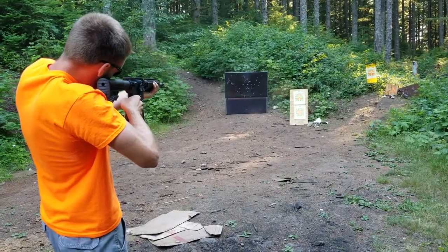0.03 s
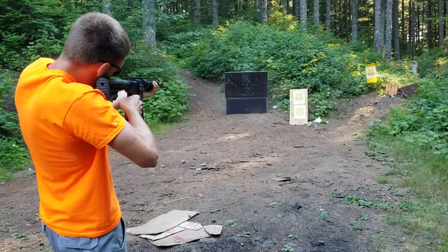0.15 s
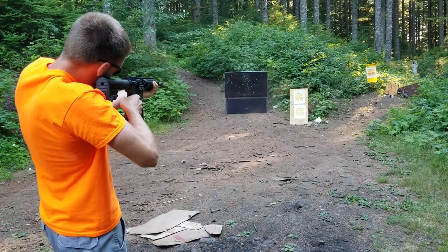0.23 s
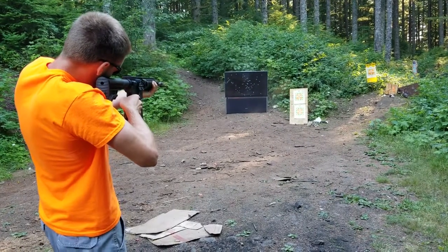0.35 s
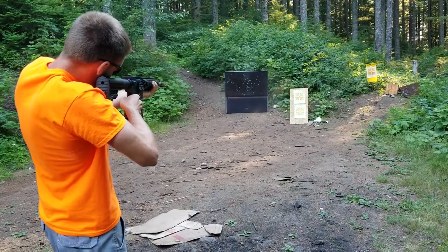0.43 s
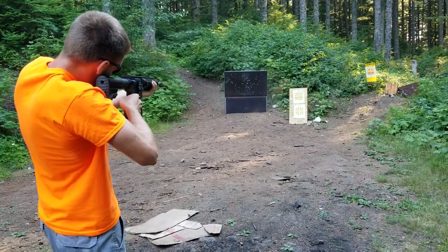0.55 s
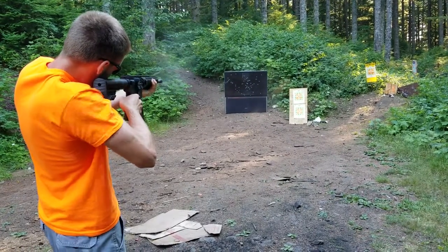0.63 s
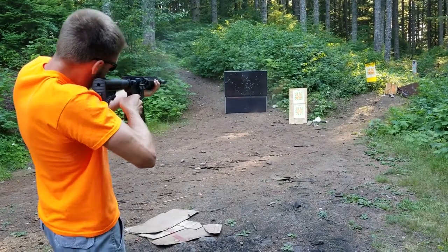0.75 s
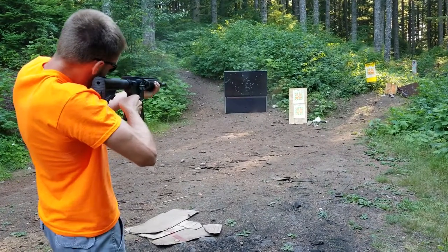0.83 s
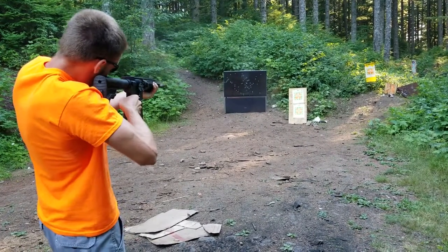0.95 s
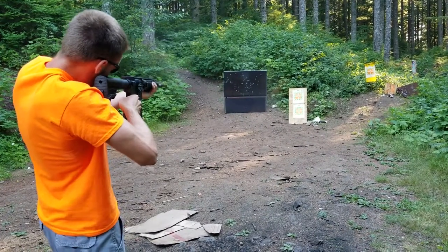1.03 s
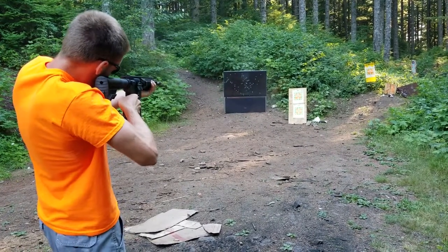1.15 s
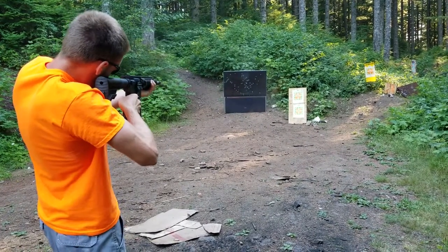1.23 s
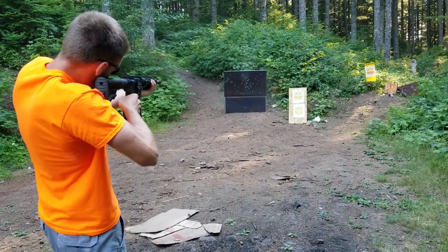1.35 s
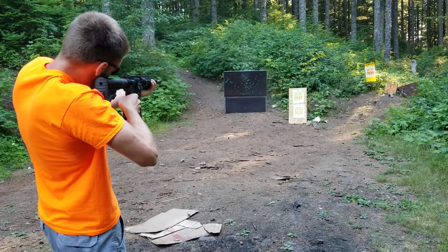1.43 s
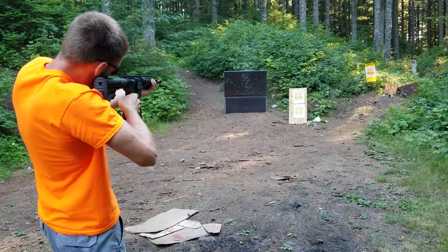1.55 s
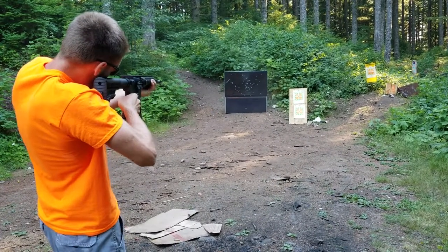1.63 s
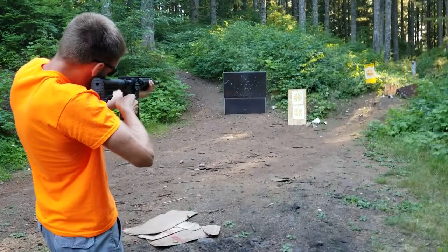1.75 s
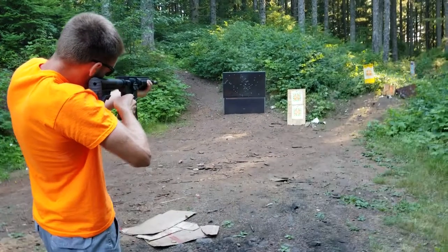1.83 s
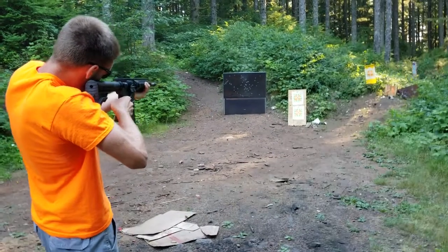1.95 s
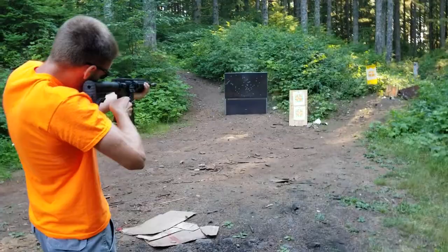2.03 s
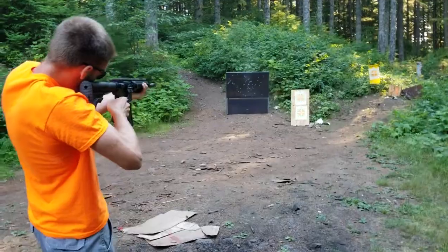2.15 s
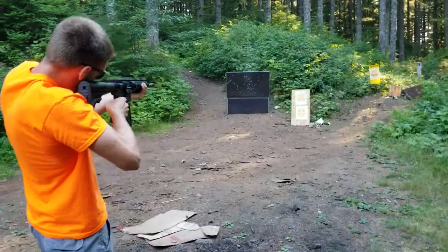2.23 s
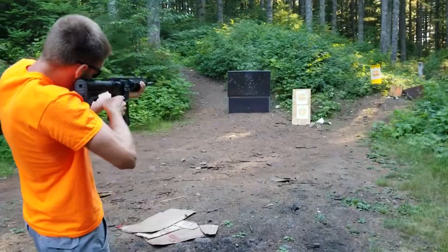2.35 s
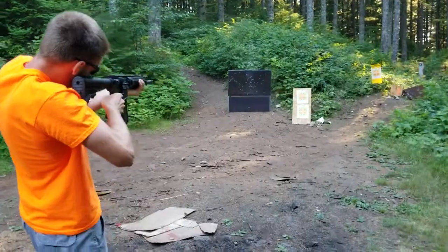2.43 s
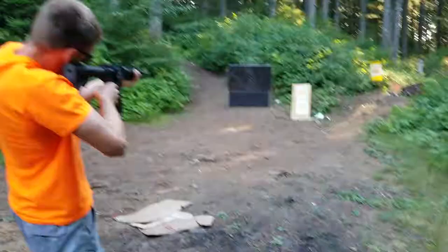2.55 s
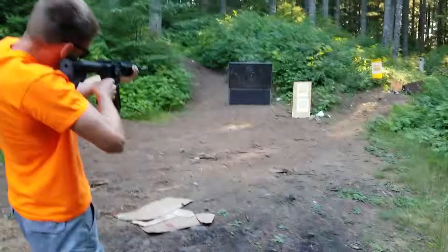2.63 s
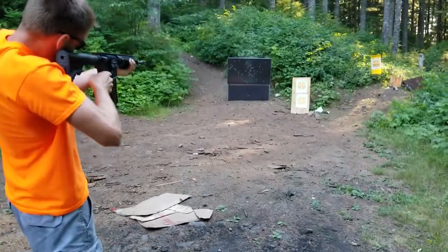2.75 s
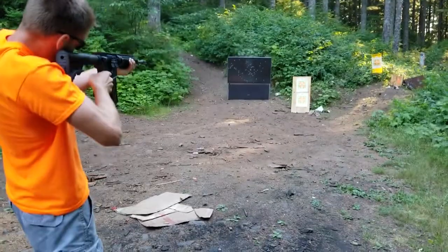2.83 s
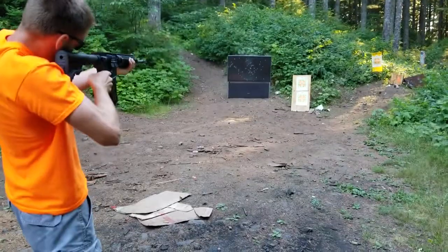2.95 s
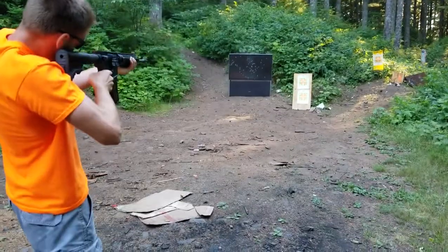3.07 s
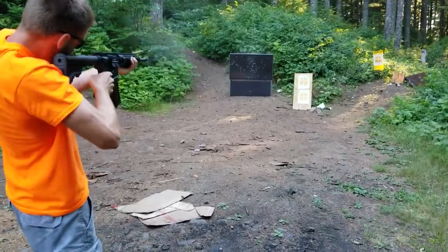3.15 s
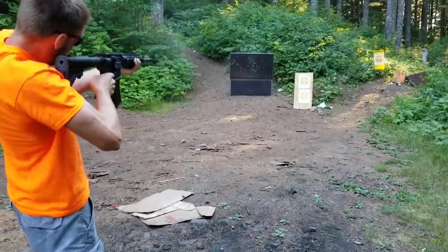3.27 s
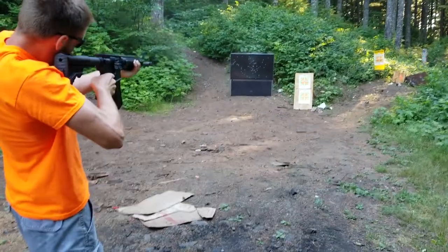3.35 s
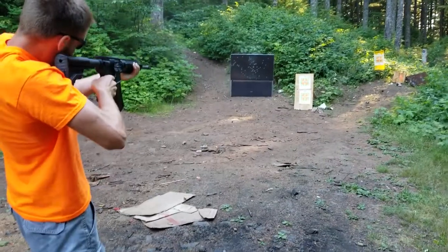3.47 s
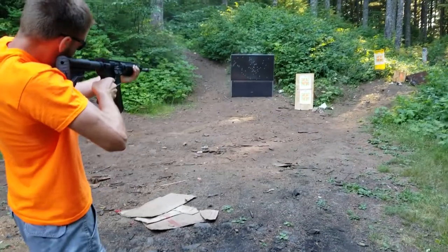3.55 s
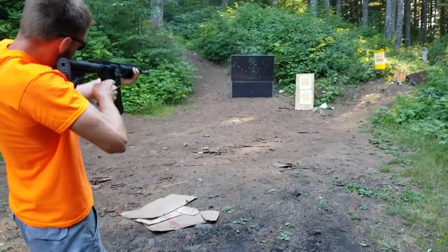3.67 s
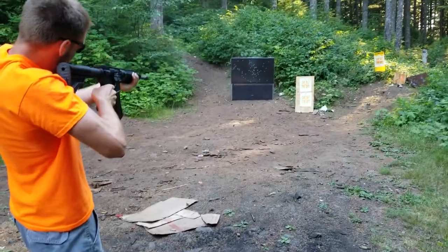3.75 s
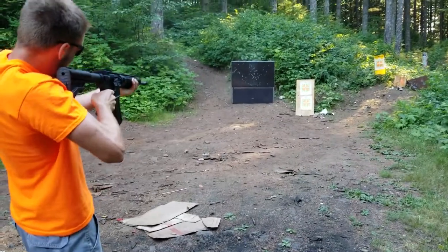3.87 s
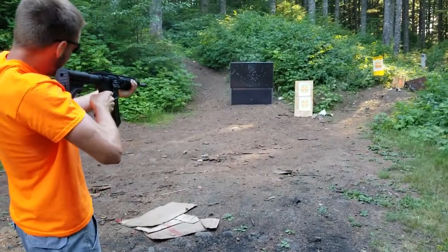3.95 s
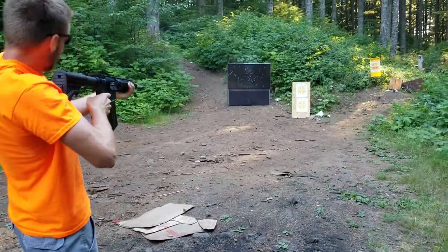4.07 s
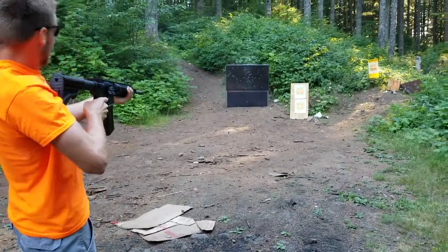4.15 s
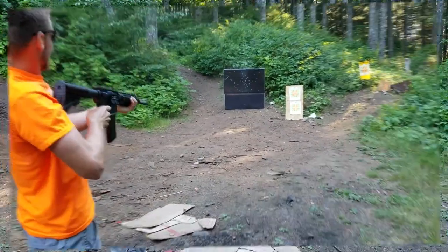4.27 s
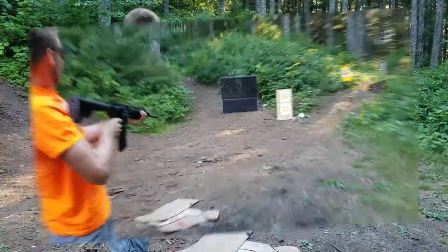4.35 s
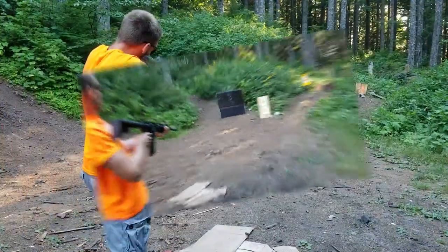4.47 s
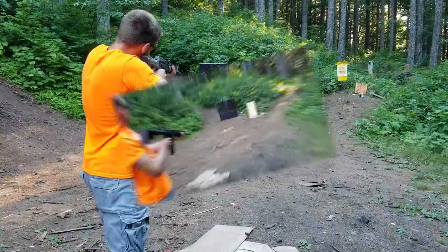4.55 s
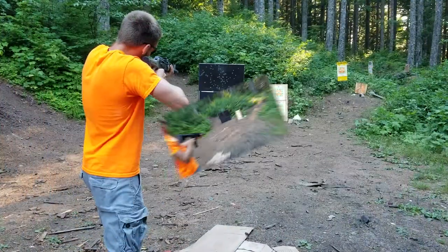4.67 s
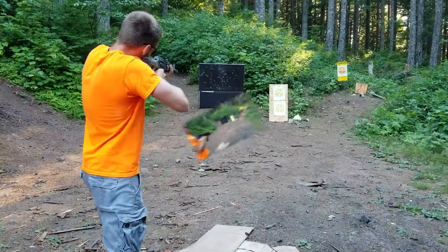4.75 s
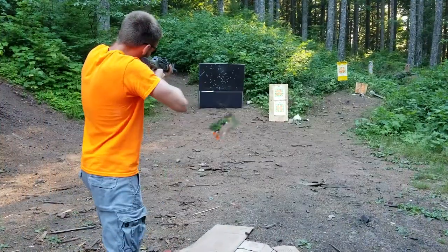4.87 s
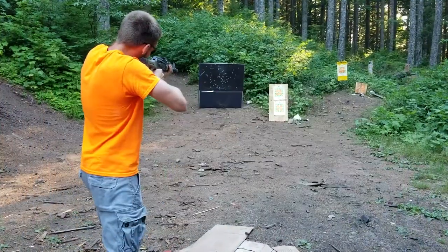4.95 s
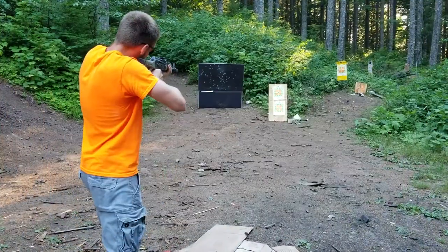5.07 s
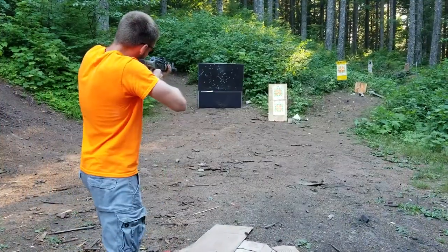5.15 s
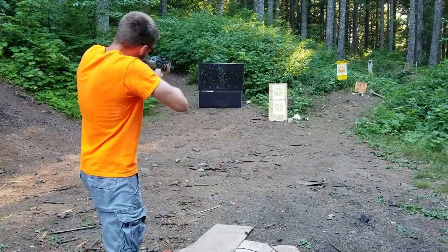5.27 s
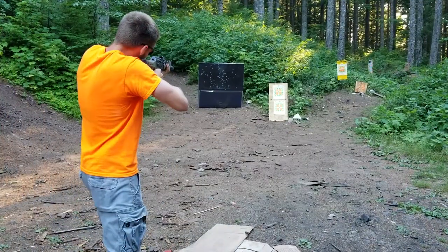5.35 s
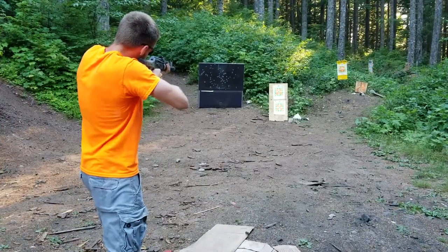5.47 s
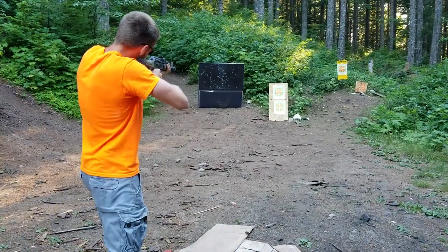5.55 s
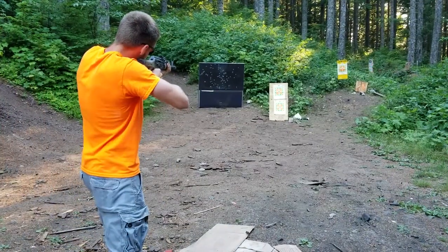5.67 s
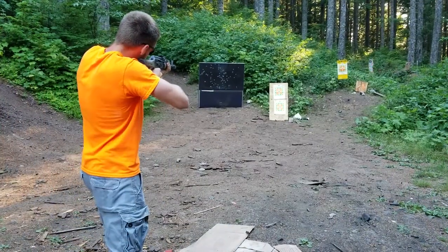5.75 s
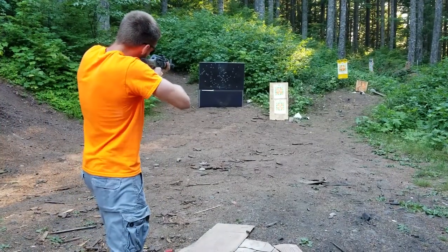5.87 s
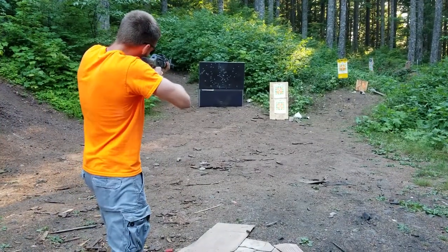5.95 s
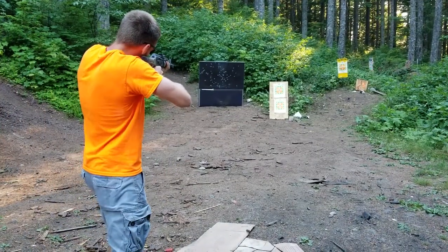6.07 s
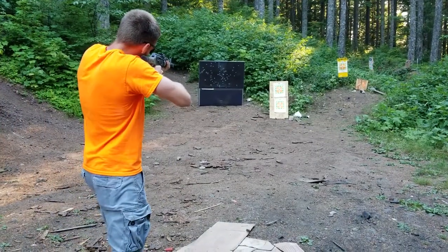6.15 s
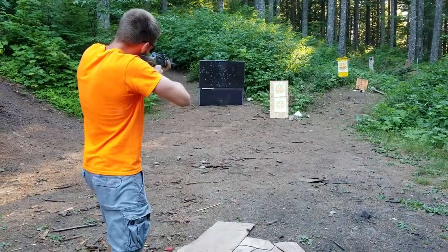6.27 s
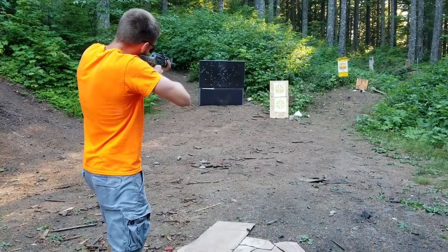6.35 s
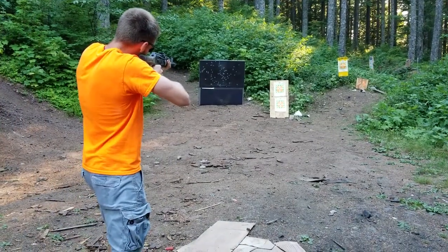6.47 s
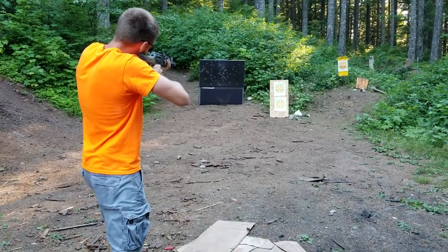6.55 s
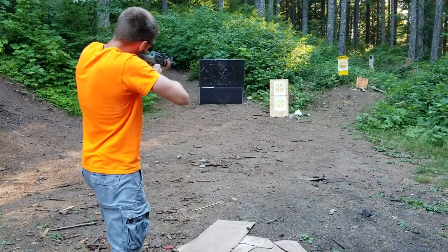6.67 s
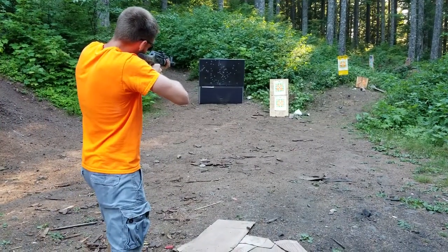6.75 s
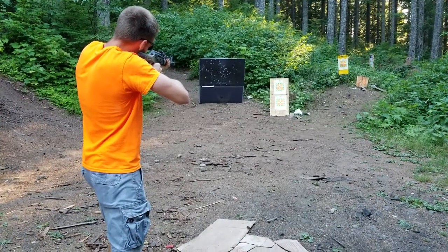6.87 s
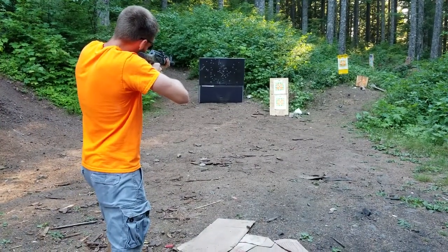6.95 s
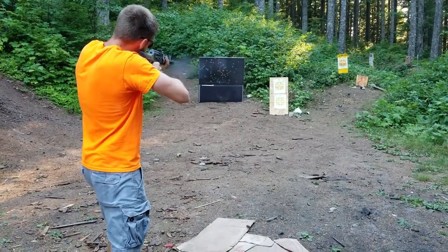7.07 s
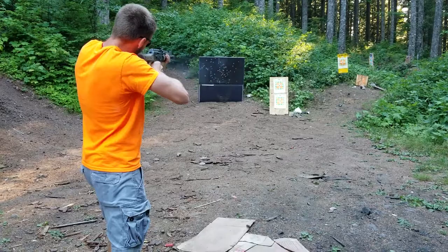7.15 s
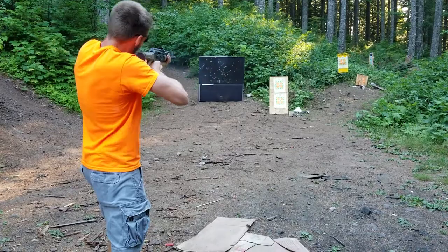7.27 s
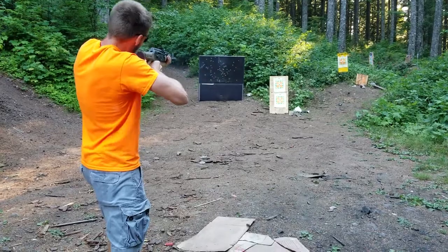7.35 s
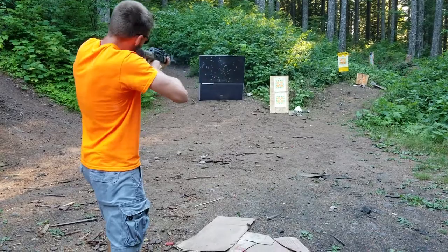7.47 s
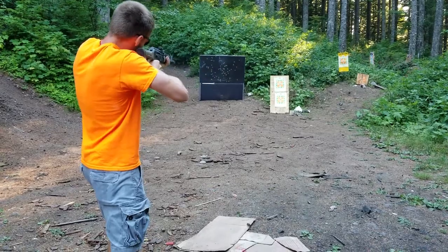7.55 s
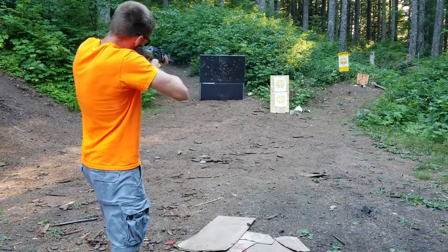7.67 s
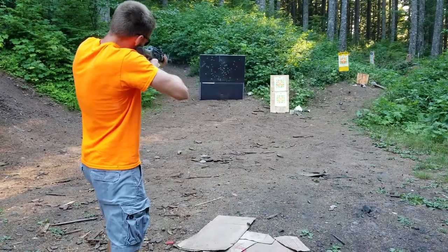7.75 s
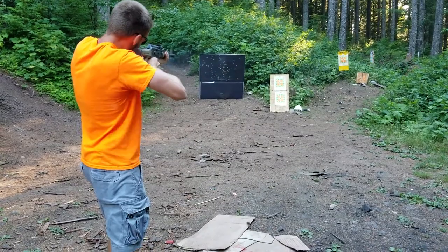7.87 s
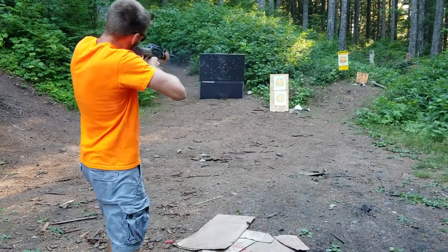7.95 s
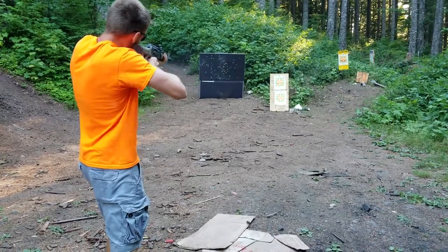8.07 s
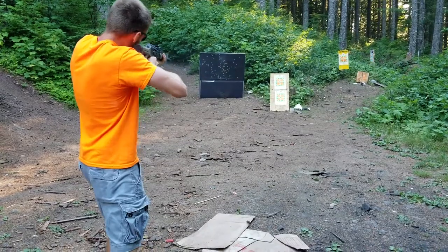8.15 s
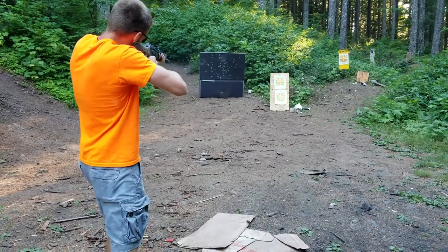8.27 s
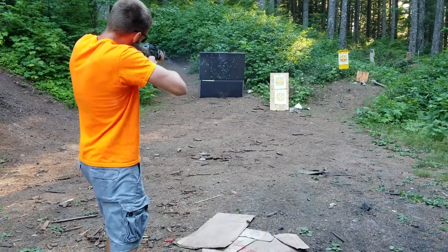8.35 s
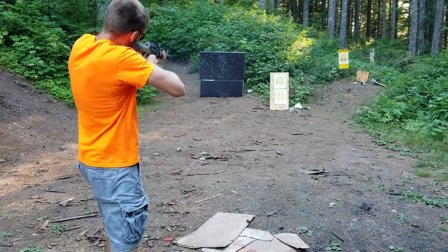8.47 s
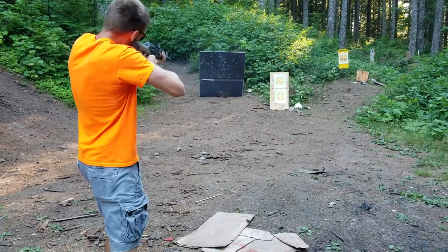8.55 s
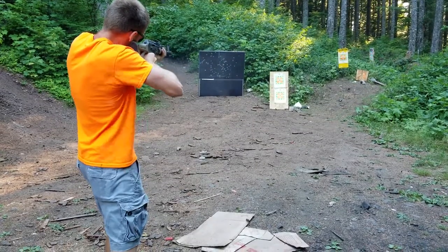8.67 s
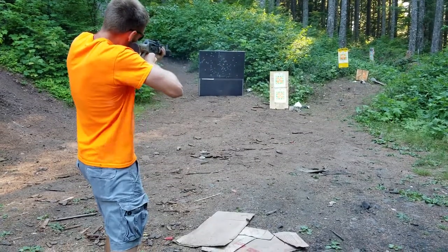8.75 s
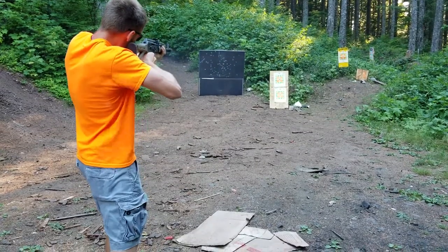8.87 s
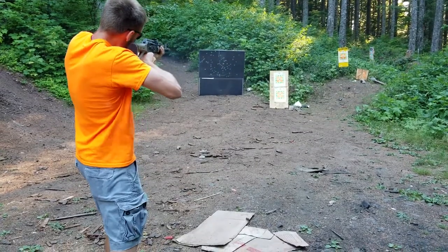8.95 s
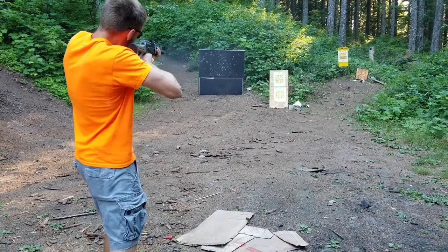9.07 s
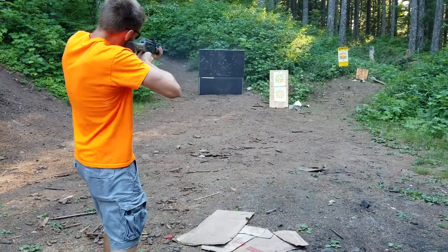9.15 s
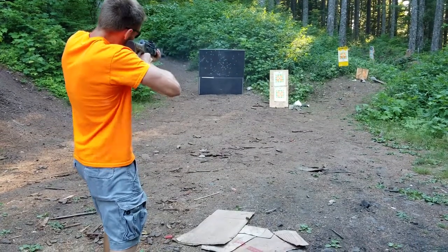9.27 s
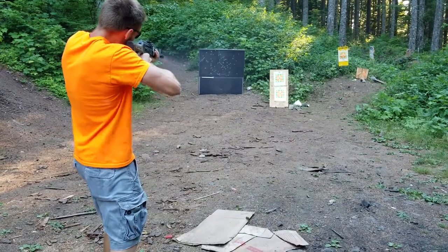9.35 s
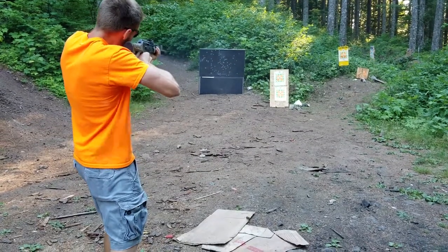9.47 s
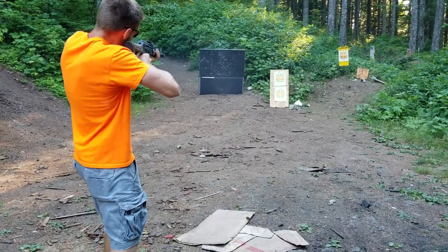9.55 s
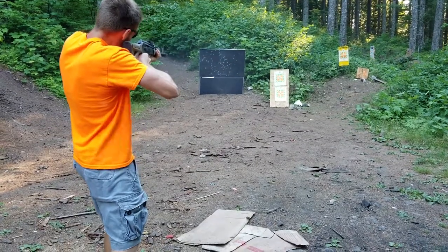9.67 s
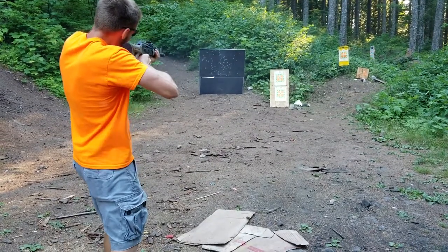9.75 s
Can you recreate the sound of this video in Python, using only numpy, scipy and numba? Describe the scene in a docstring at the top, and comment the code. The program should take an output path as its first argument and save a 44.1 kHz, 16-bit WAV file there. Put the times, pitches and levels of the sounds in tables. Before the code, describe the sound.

Just behind a shooter in a forest clearing, the fading tail of an earlier shot opens, then two single rifle blasts about two and a half seconds apart, each with slaps off banks and trunks and a long rolling echo. After a quiet gap with faint ticks, another shot from slightly further back leads to a rapid burst of shots. A small stereo recorder squashes and overloads on the bangs.

```python
"""Rifle shots in a forest clearing

Heard from just behind the shooter: the tail of an earlier shot, two single shots, a cross-fade to a second
stand further back, then one shot and a rapid string. Blasts are decaying noise with a low pressure pulse;
banks and trunks return N-shaped slaps, the forest a rolling tail, a far hillside a late swell.
Ticks, faint hums, a rustle and quiet air lie beneath; a small recorder limits, overloads and recovers."""
import sys
import numpy as np
from scipy import signal
from scipy.fft import rfft, irfft, next_fast_len
from scipy.io import wavfile
from numba import njit

SR = 44100
rng = np.random.default_rng(int(sys.argv[2]) if len(sys.argv) > 2 else 0)


def pcm_store(signal):
    """Save signal as 16-bit PCM."""
    levels = np.round(np.clip(np.atleast_2d(signal), -1, 1) * 32767)
    wavfile.write(sys.argv[1], SR, levels.astype(np.int16).T)


def voltage_ratio(level):
    """Linear amplitude factor for a level in decibels (scalar or array-like)."""
    return 10 ** (np.asarray(level, float) / 20)


N = 432621

# Cross-fade from the near stand to the one further back: start and end [t/s]
CROSSFADE = [4.55, 5.15]
# Shots: [t/s, blast level/dB, thump level/dB]; a shot before t = 0 leaves only its tail
SHOTS = [(-1.9, 0, -22), (.5827, 0, -15), (3.1112, 0, -11), (7.0615, 0, 6), (7.7748, 0, -17),
         (8.3053, -1.5, -23), (8.5624, 0, -18), (8.7787, 0, -18), (9.0334, 0, -19), (9.3125, 0, -19),
         (9.5634, 0, -14)]
LEFT_DB = .6   # the left microphone faces the muzzle: left-right level difference
TILT_DB_PER_OCT = .8   # spread of the crack's brightness from shot to shot


def rifle():
    """Superposition: direct sound, slaps and tails of every shot add linearly; one stereo track per stand."""
    out = np.zeros((2, 2, N))
    long, short = 2 ** 17, 2 ** 14   # samples
    reflectors = [[row[1:] for row in SLAPS if row[0] == name] + trunks(count=16) for name in ("near", "back")]
    hill = hillside(long)
    tails = [forest(stand, long) + hill for stand in range(2)]
    push = thump(short)
    tilts = TILT_DB_PER_OCT * rng.standard_normal(len(SHOTS))
    for (s, db, thump_db), tilt in zip(SHOTS, tilts):
        at, stand = round(s * SR), int(s > CROSSFADE[0])
        track = out[stand]
        add(track, voltage_ratio(db) * tails[stand], at)
        if at > 0:
            add(track, voltage_ratio(db) * slaps(reflectors[stand], short), at)
            add(track, voltage_ratio(db) * crack(stand, tilt, short), at - round(.0015 * SR))
            add(track, voltage_ratio(thump_db) * push, at + round(.0025 * SR))   # peaks after the crack
            hammer(track, stand, at)
            bolt(track, at)
    return out * voltage_ratio(LEFT_DB * np.array([[.5], [-.5]]))


# Muzzle crack scattered by things close by: spectrum [f/Hz, level/dB per Hz]
CRACK = [(18, -30), (40, -17), (190, -10), (400, -8), (900, -8), (1200, -13), (3200, -11), (5900, -12),
         (6800, -9), (7500, -14), (8400, -21), (11000, -16), (14500, -13), (16200, -22)]
# Its decay [f/Hz, t60/s]
CRACK_T60 = [(40, .12), (150, .15), (500, .2), (1500, .24), (4000, .24), (8000, .22), (14000, .22)]
# Its level at the near and back stand [level/dB]
CRACK_DB = [13.0, 13.0]


def crack(stand, tilt, size):
    """Turbulent noise: a fresh random burst for each shot, with frequency-dependent decay."""
    t = np.arange(size) / SR
    colour = [(hz, level_db + tilt * np.log2(hz / 2500)) for hz, level_db in CRACK]
    rise = np.minimum(t / .0055, 1) ** 2
    return voltage_ratio(CRACK_DB[stand]) * dying(colour, CRACK_T60, size) * rise


def thump(size):
    """Critically damped response: a pressure step pushes the diaphragm, which swings back and settles."""
    settle = np.arange(size) / SR / .005   # time in units of the 5 ms settling constant
    # a push, then a slower pull of equal area
    return settle * (2 - settle) * np.exp(-settle) * np.ones((2, 1))


# Strong slaps off ground, banks and big trunks:
# [stand, t/ms after the blast, level/dB, left-right level/dB, f/Hz]
SLAPS = [("near", 1.5, 5, -3, 900), ("near", 8.5, 5, 0, 330), ("near", 12.4, 7, 5, 690),
         ("near", 16.5, 5, -4, 780), ("near", 36.3, 3, 1, 450), ("near", 74.6, 5, -1, 560),
         ("near", 77.0, 4.5, -1, 300), ("near", 93.7, 3, 0, 440), ("near", 129.4, 0, 3, 680),
         ("near", 66.9, 2, -3, 560), ("back", 1.7, 2, -2, 510), ("back", 5.0, 6, -5, 380),
         ("back", 8.3, 8, 5, 420), ("back", 13.6, 10, 4, 750), ("back", 16.6, 10, 1, 430),
         ("back", 26.9, 7, 0, 700), ("back", 65.5, 3, 2, 520), ("back", 69.6, 4, -2, 280),
         ("back", 78.7, 5, 1, 750), ("back", 61.5, 2, 0, 810), ("back", 103, -1, 2, 520),
         ("back", 129.2, 0, 3, 760)]
AIM_DB = 1.5   # spread of each slap's level from shot to shot as the aim shifts
LEAD_MS_PER_DB = .12   # a slap reaches the nearer, louder microphone first
SWINGS = .75   # Gaussian width of a slap, in periods


def slaps(table, size):
    """Specular reflection: each returns the blast's N-shaped push, dulled to little more than one swing."""
    out, around = np.zeros((2, size)), np.arange(-250, 250)
    for (ms, db, pan_db, hz), chance in zip(table, rng.standard_normal(len(table))):
        side_db = pan_db * np.array([[.5], [-.5]])
        u = around / SR + side_db * LEAD_MS_PER_DB / 1000
        push = -np.sin(2 * np.pi * hz * u) * np.exp(-(u * hz / SWINGS) ** 2)
        at = round(ms * SR / 1000) + around
        gain = voltage_ratio(db + side_db + AIM_DB * chance)
        out[:, at[at >= 0]] += gain * push[:, at >= 0]
    return out


# Lesser trunks: first and last delay [t/ms]
TRUNK_DELAYS = [18, 200]
# Their lowest and highest pitch [f/Hz]
TRUNK_PITCHES = [380, 950]
TRUNK_DB, TRUNK_LOSS_DB_PER_MS = 1.2, .095   # level at zero delay, loss with delay
TRUNK_SPREAD_DB, TRUNK_PAN_DB = 2.5, 3.0   # spread of level and of left-right difference


def trunks(count):
    """Spreading loss: random slap rows (ms, dB, left-right dB, Hz), on average fainter with delay."""
    where, pitch = rng.random((count, 2)).T
    louder, aside = rng.standard_normal((count, 2)).T
    (first, last), (low, high) = TRUNK_DELAYS, TRUNK_PITCHES
    ms = first + where * (last - first)
    hz = low * (high / low) ** pitch
    db = TRUNK_DB - TRUNK_LOSS_DB_PER_MS * ms + TRUNK_SPREAD_DB * louder
    return list(zip(ms, db, TRUNK_PAN_DB * aside, hz))


# Hammer fall: level at the near and back stand [level/dB]
HAMMER_DB = [-21.0, -33.0]


def hammer(track, stand, at):
    """Impact: the hammer falls 9.8 ms before the blast and its clack dies exponentially."""
    add(track, voltage_ratio(HAMMER_DB[stand]) * clack(t60=.018), at - round(.0098 * SR))


# Bolt cycling after each blast: [t/ms, level/dB]
BOLT = [(51, -1.5), (83, -6)]


def bolt(track, at):
    """Impact: the cycling bolt strikes metal after the blast, each clack dying exponentially."""
    for ms, db in BOLT:
        add(track, voltage_ratio(db) * clack(t60=.05), at + round(ms * SR / 1000))


def clack(t60):
    """Damped impact noise: a short metallic burst with the colour of the crack."""
    t = np.arange(4096) / SR
    return steady(CRACK, len(t)) * np.minimum(t / .0015, 1) * voltage_ratio(-60 * t / t60)


# Forest tail: spectrum [f/Hz, level/dB per Hz]
FOREST = [(18, -50), (40, -26), (120, -9), (190, -3), (300, -6), (450, -8.5), (720, -2), (1000, -13),
          (2200, -8), (3600, -9), (7000, -8), (8300, -19), (10500, -13.5), (13500, -9), (16200, -19)]
# Its decay [f/Hz, t60/s]
FOREST_T60 = [(40, .85), (100, .65), (200, .95), (420, 1.3), (1100, 1.38), (2900, 1.03), (6000, .8),
              (9000, .55), (14000, .45)]
# Its level at the near and back stand [level/dB]
FOREST_DB = [-3.5, -3.5]
LUMPS_PER_S = 30   # rate at which echo clusters roughen the tails


def forest(stand, size):
    """Diffuse reverberation: multiple scattering builds up and decays, the same for every shot at a stand."""
    t = np.arange(size) / SR
    rise = 1 - np.exp(-t / .09)
    clusters = lumps(1.9, LUMPS_PER_S, size)   # clustered trunks
    return voltage_ratio(FOREST_DB[stand]) * dying(FOREST, FOREST_T60, size) * rise * clusters


# Deep woods and far slope: spectrum [f/Hz, level/dB per Hz]
HILL = [(70, -55), (120, -29), (330, -1), (600, -1), (930, -14), (1300, -14), (1900, -18), (3200, -25),
        (5000, -40), (8000, -60)]
WOODS_DB, WOODS_HOLD_S, WOODS_FADE_DB_S = -52, .9, 14
HILL_M, HILL_DB, HILL_RISE_DB_S, HILL_FADE_DB_S = 250, -50.5, 22, 9


def hillside(size):
    """Echo delay: the slope answers after the way there and back, over the murmur of the deep woods."""
    t = np.arange(size) / SR
    back_s = 2 * HILL_M / 343   # speed of sound in m/s
    woods = voltage_ratio(WOODS_DB - WOODS_FADE_DB_S * np.maximum(t - WOODS_HOLD_S, 0)) * np.minimum(t / .3, 1)
    slope = voltage_ratio(HILL_DB - np.maximum(HILL_RISE_DB_S * (back_s - t), HILL_FADE_DB_S * (t - back_s)))
    clusters = lumps(1.5, LUMPS_PER_S, size)   # echoes come back in clusters
    return steady(HILL, size) * np.hypot(woods, slope) * clusters


# Small ticks nearby, brass and twigs: [t/s, nominal peak level/dB, f/Hz, t60/s]
TICKS = [(1.289, -58, 13000, .03), (1.8198, -27, 1800, .014), (1.9185, -44, 2200, .02),
         (1.929, -49, 6000, .012), (2.570, -48, 7000, .012), (4.407, -54, 3000, .08),
         (4.418, -55, 6500, .05), (4.513, -58, 5500, .015), (4.547, -48, 1500, .012),
         (5.485, -57, 6200, .015), (6.203, -56, 3400, .03), (6.267, -51, 12500, .1),
         (6.473, -51, 13500, .1), (6.544, -58, 12000, .03)]


def ticks():
    """Damped impact: brief noise in a wide band around each tick's pitch, dying exponentially."""
    out, t = np.zeros((2, N)), np.arange(2048) / SR
    for s, db, hz, t60 in TICKS:
        band = [(hz / 8, -14), (hz / 1.5, -6), (hz, 0), (hz * 1.6, -5), (hz * 5, -20)]
        decay = voltage_ratio(db - 4 - 60 * t / t60)   # rms starts 4 dB below the nominal peak
        add(out, decay * steady(band, len(t)), round(s * SR))
    return out


# Thin treble rustle: spectrum [f/Hz, level/dB per Hz]
RUSTLE = [(2060, -42), (3500, -12), (3800, -15), (4260, -10), (5160, -8), (7270, 1), (9030, -17),
          (12900, -4), (16000, -11)]
# Its creep: [start t/s, level/dB, growth/dB per s]
RUSTLE_CREEP = (1.9, -83, 20)
# Its flare: [t/s, level/dB, Gaussian width t/s]
RUSTLE_FLARE = (2.82, -59, .13)


def rustle():
    """Incoherent addition: the powers of a slow creep and one flare sum in thin treble noise."""
    t = np.arange(N) / SR
    start, creep_db, growth_db = RUSTLE_CREEP
    flare, flare_db, width = RUSTLE_FLARE
    creep = voltage_ratio(creep_db + growth_db * (np.clip(t, start, flare) - start)) * (t > start)
    level = np.hypot(creep, voltage_ratio(flare_db) * np.exp(-((t - flare) / width) ** 2))
    return steady(RUSTLE, N) * level * (t < 3.09)   # stops at 3.09 s


# Faint narrow hums and hisses: [start t/s, end t/s, f/Hz, bandwidth/Hz, level/dB]
HUMS = [(2.15, 3.1, 88, 14, -78), (6.3, 7.06, 170, 14, -78), (5.15, 6.25, 3200, 400, -75),
        (4.9, 7.06, 14300, 150, -84), (0, .58, 14300, 150, -84)]


def hums():
    """Narrow-band noise: bands around fixed pitches, faded in and out."""
    out = np.zeros((2, N))
    for start, end, hz, width, db in HUMS:
        t = np.arange(round((end - start) * SR)) / SR
        band = [(hz - 2 * width, -40), (hz - width / 2, 0), (hz + width / 2, 0), (hz + 2 * width, -40)]
        fade = np.minimum(np.minimum(t / .2, (t[-1] - t) / .03), 1)
        add(out, voltage_ratio(db) * steady(band, len(t)) * fade, round(start * SR))
    return out


# Quiet air at the near stand: spectrum [f/Hz, level/dB per Hz]
AIR_NEAR = [(18, -45), (40, -22), (90, -9), (200, -8), (800, -10), (2200, -8), (4200, -15), (6700, -15),
            (7600, -26), (10000, -27), (14200, -18), (16200, -24)]


def air_near():
    """Stationary noise: the quiet air keeps one level and colour."""
    return voltage_ratio(-71.0) * steady(AIR_NEAR, N)


# Quiet air at the back stand: spectrum [f/Hz, level/dB per Hz]
AIR_BACK = [(18, -22), (30, -9), (110, -6), (170, -7), (260, -13), (450, -10), (800, -2), (1300, -7),
            (2000, -14), (3000, -13), (4500, -20), (6700, -13), (8300, -28), (14000, -18), (16200, -25)]


def air_back():
    """Interchannel level and time difference: the air lies to the right; it swells with the breeze."""
    level = voltage_ratio(-63.5 - 2.5 * np.array([[.5], [-.5]]))   # left 2.5 dB weaker than right
    breeze = lumps(1.2, 4.0, N)
    left, right = level * steady(AIR_BACK, N) * breeze
    return np.array([np.roll(left, round(.00043 * SR)), right])   # left lags by 0.43 ms


def lumps(depth_db, per_s, size):
    """Random amplitude modulation: a gain wandering in dB between random knots."""
    knots = rng.standard_normal(512)
    return voltage_ratio(depth_db * np.interp(np.arange(size) / SR * per_s, np.arange(len(knots)), knots))


def read(points, hz):
    """Logarithmic frequency scale: straight lines between table points."""
    x, y = np.transpose(points)
    return np.interp(np.log(hz), np.log(x), y)


# Left-right likeness of all noise: [f/Hz, correlation]
LIKENESS = [(60, 0.94), (130, 0.95), (290, 0.74), (640, 0.17), (1410, -0.12), (3100, 0.05), (6820, -0.01),
            (15000, -0.0)]


def coloured(spectrum, size):
    """Interchannel coherence: spectrum of stereo noise with rms 1, alike in the bass, and its frequencies."""
    hz = np.maximum(np.fft.rfftfreq(size, 1 / SR), 1)
    mid, side = rfft(rng.standard_normal((2, size)))
    alike = np.clip(read(LIKENESS, hz), -1, 1)
    gain = voltage_ratio(read(spectrum, hz))
    pair = np.sqrt(1 + alike) * mid + np.sqrt(1 - alike) * side * [[1], [-1]]
    return pair * gain / np.sqrt(2 * np.mean(gain ** 2)), hz


def steady(spectrum, size):
    """Stationary noise: stereo noise of the given colour."""
    fast = next_fast_len(size, True)
    return irfft(coloured(spectrum, fast)[0], fast)[:, :size]


def dying(spectrum, t60s, size):
    """Frequency-dependent damping: overlapping noise bands each die at their own rate."""
    pair, hz = coloured(spectrum, size)
    t, centres = np.arange(size) / SR, np.log(np.array(t60s)[:, 0])
    out = np.zeros((2, size))
    for share, (_, t60) in zip(np.eye(len(t60s)), t60s):
        band = irfft(pair * np.interp(np.log(hz), centres, share), size)
        out += band * voltage_ratio(-60 * t / t60)
    return out


def add(track, sound, at):
    """Linear superposition: mix a sound in at a sample index that may lie before the start."""
    part = sound[:, max(-at, 0):N - at]
    track[:, max(at, 0):max(at, 0) + part.shape[1]] += part


def scene():
    """Linear cross-fade: the near stand gives way to the one further back."""
    fade = np.interp(np.arange(N) / SR, CROSSFADE, [0, 1])
    near, back = rifle()
    near = near + air_near() + rustle()
    back = back + air_back()
    return (1 - fade) * near + fade * back + ticks() + hums()


@njit
def cut_db(over_db, attack, quick, slow, pause, bang_db):
    """Feedback-free gain control: a cut that springs back after a lone bang, creeps back after repeated ones."""
    cut, now, since, back = np.zeros(len(over_db)), 0.0, pause, quick
    for i in range(len(over_db)):
        since += 1
        if over_db[i] > bang_db:
            if since > pause / 10:   # a new bang sets the recovery rate
                back = quick if since >= pause else slow
            since = 0
        if over_db[i] > now:
            now += attack * (over_db[i] - now)
        else:
            now = max(now - back, 0.0)
        cut[i] = now
    return cut


THRESHOLD_DB, SQUEEZE = -15.2, .8   # share of the excess level that is taken away
ATTACK_MS, DETECT_MS = 1.8, 2.5   # time constants
QUICK_DB_S, SLOW_DB_S = 700, 30.0   # recovery after a pause, and in a busy stretch
PAUSE_S, BANG_DB = 1.3, 14   # a bang demands more than this cut
RAIL = .97   # top of the wave


def limit(dry):
    """Dynamic compression: one gain, driven by the mean power of both channels."""
    keep = np.exp(-1000 / (DETECT_MS * SR))
    power = signal.lfilter([1 - keep], [1, -keep], np.mean(dry ** 2, axis=0))
    over_db = SQUEEZE * (10 * np.log10(power + 1e-12) - THRESHOLD_DB)
    attack = 1 - np.exp(-1000 / (ATTACK_MS * SR))
    cut = cut_db(over_db, attack, QUICK_DB_S / SR, SLOW_DB_S / SR, PAUSE_S * SR, BANG_DB)
    return dry * voltage_ratio(-cut)


def top_cut(x):
    """Nothing passes above the cut-off."""
    return signal.sosfilt(signal.butter(12, 16340, fs=SR, output="sos"), x)


def record(dry):
    """Saturation: the limited signal overloads smoothly at the rails, then loses its deepest bass."""
    railed = RAIL * np.tanh(limit(dry) / RAIL)
    # coupling capacitor after the overloaded stage, 22 Hz
    coupled = signal.sosfilt(signal.butter(1, 22, "high", fs=SR, output="sos"), railed)
    return top_cut(coupled)


dry = scene()
out = record(dry)
pcm_store(out)
```